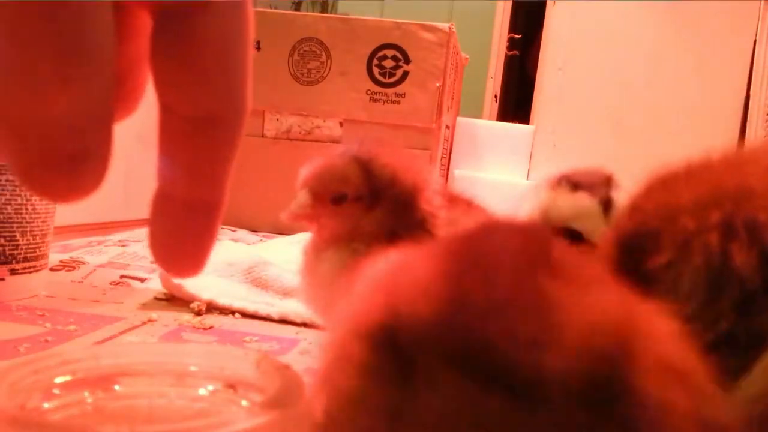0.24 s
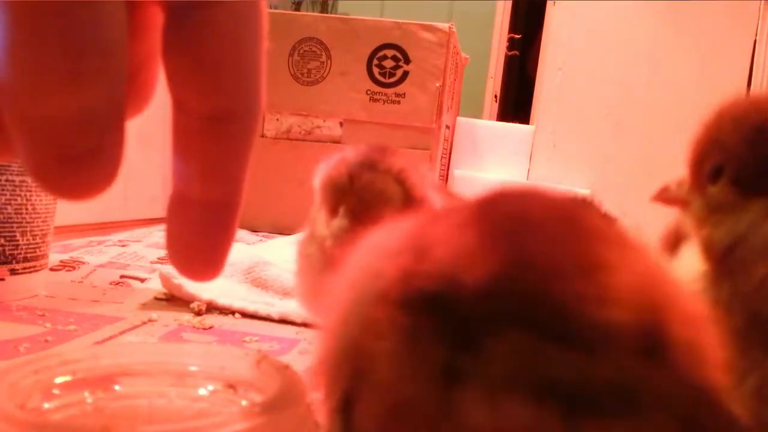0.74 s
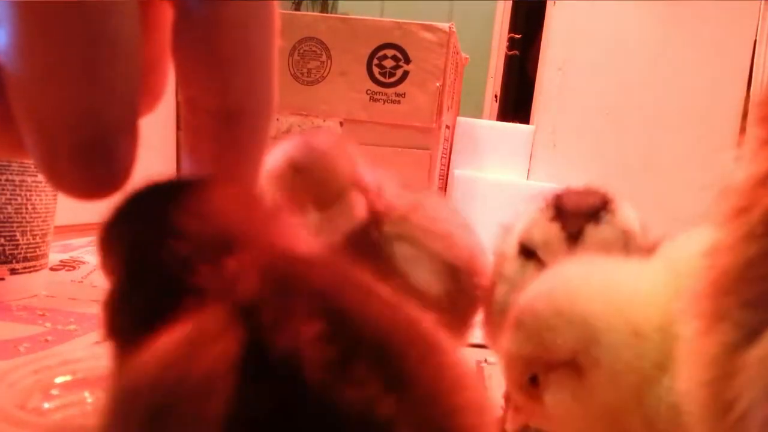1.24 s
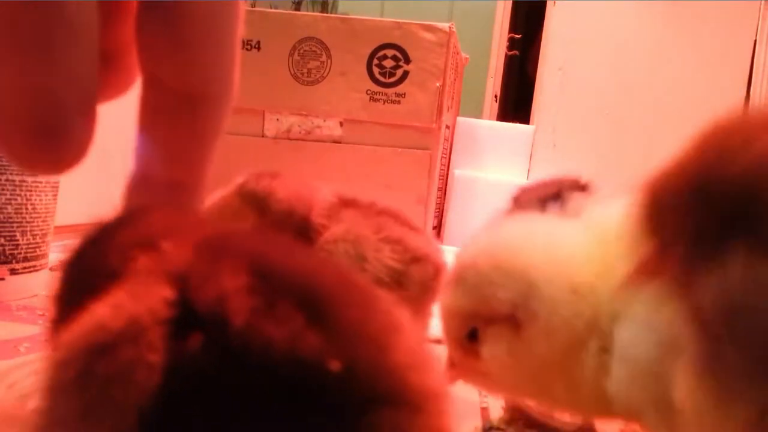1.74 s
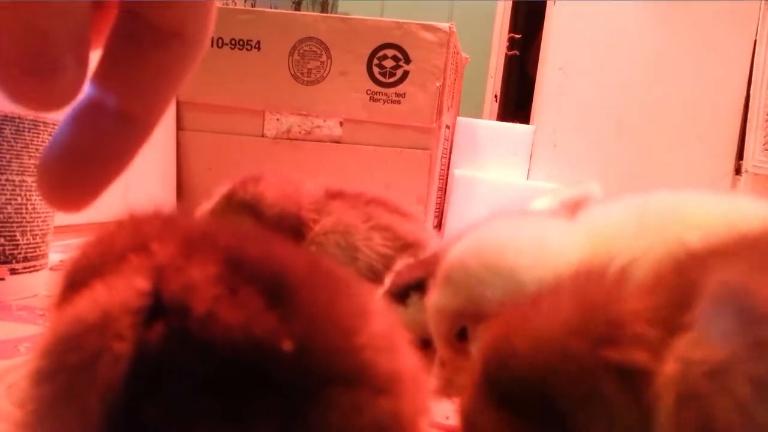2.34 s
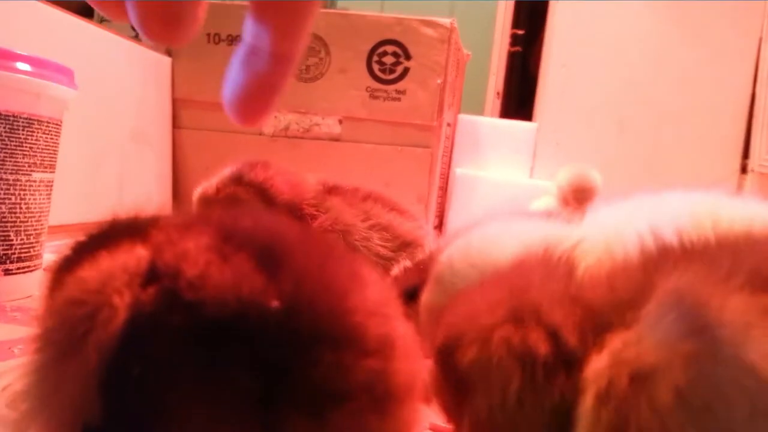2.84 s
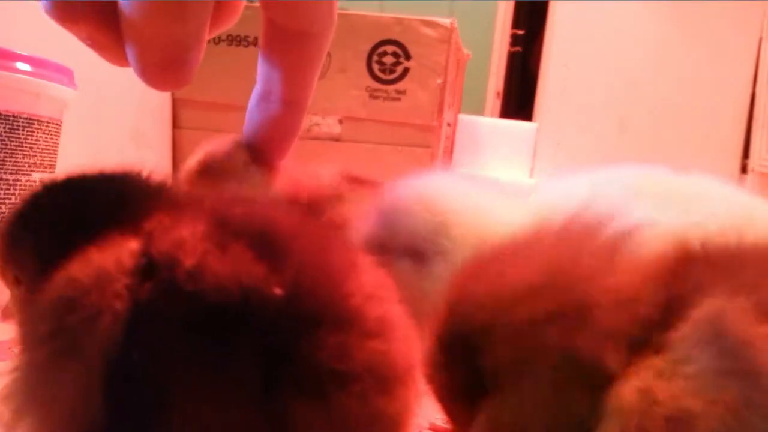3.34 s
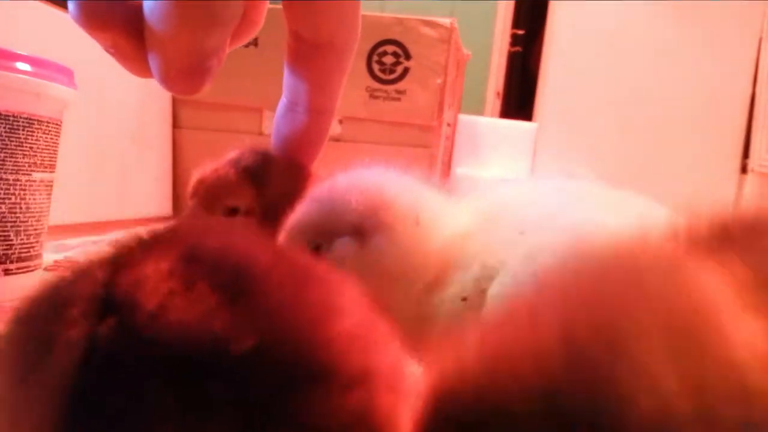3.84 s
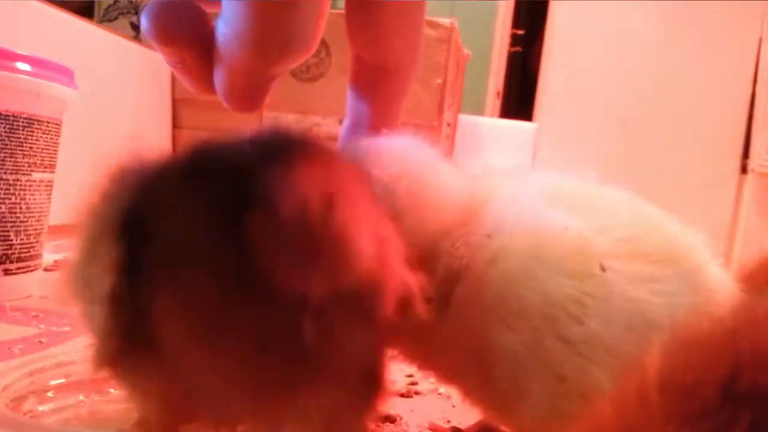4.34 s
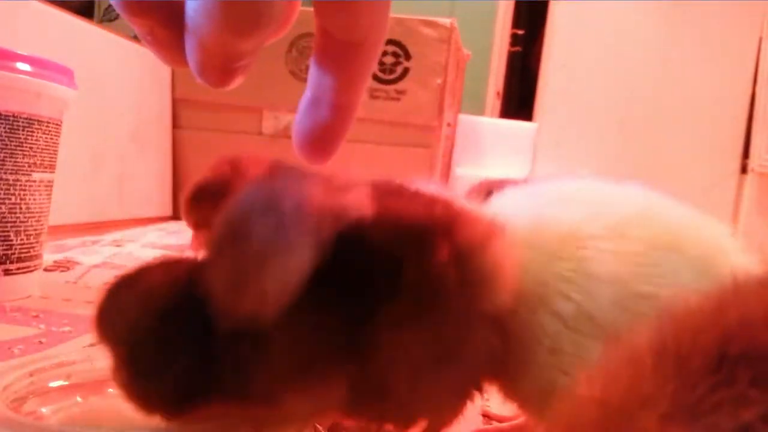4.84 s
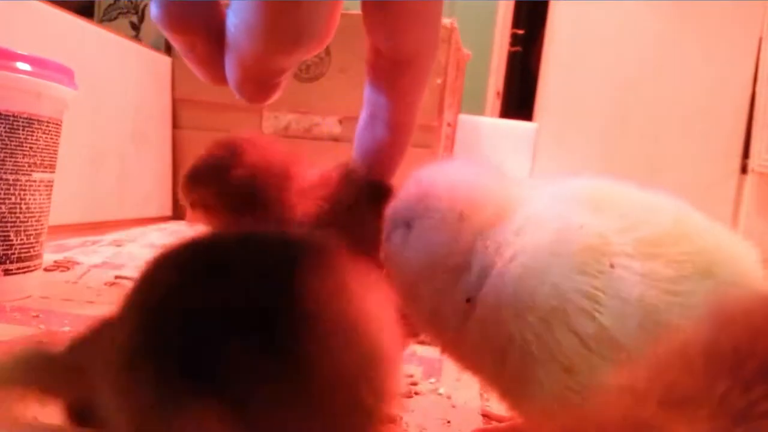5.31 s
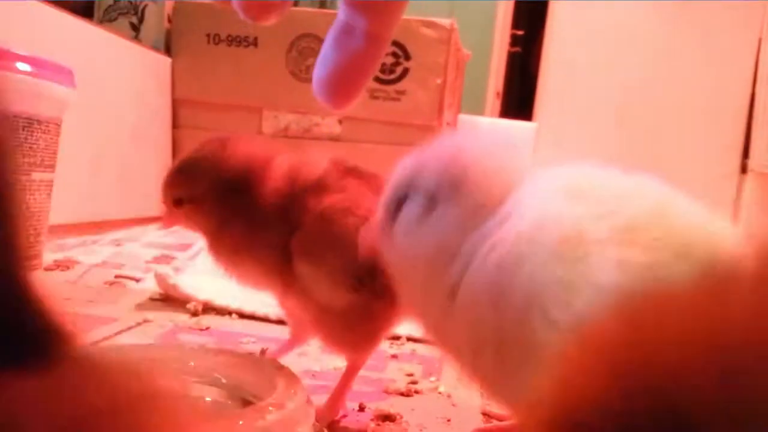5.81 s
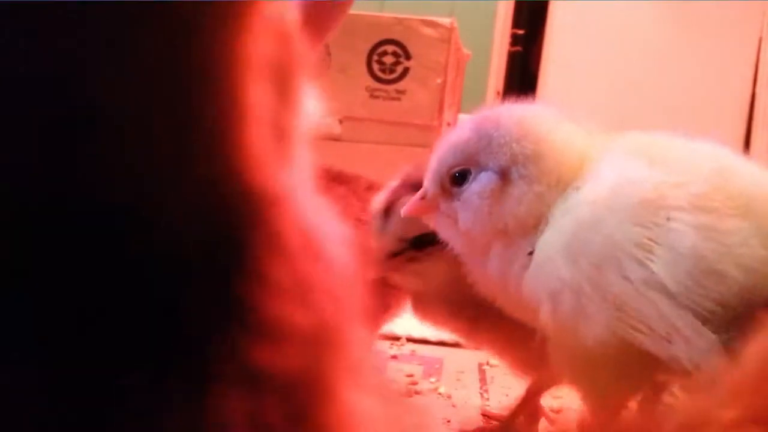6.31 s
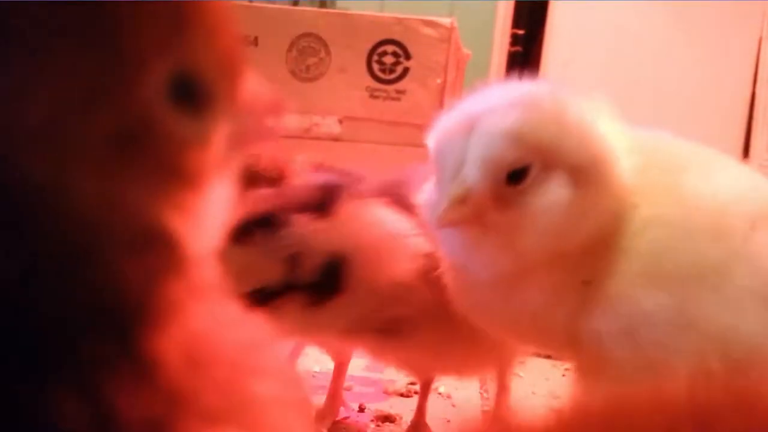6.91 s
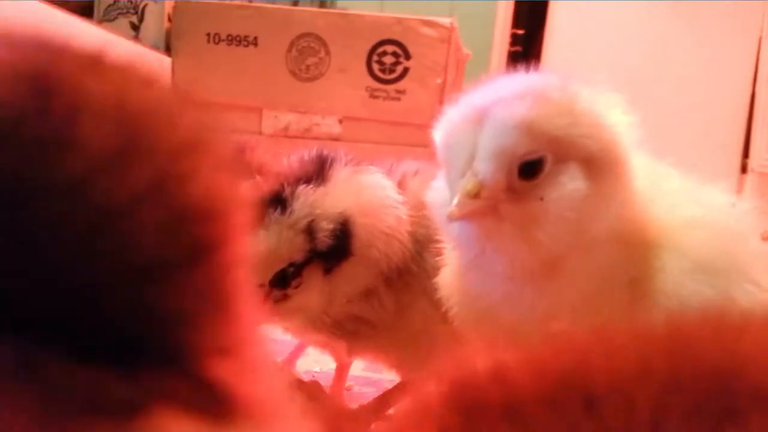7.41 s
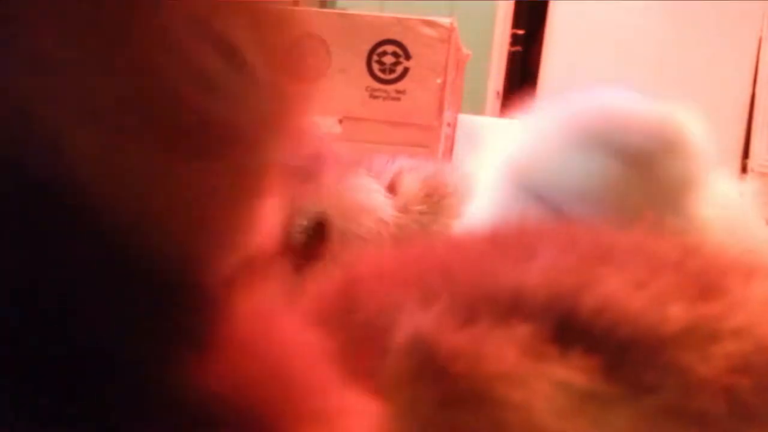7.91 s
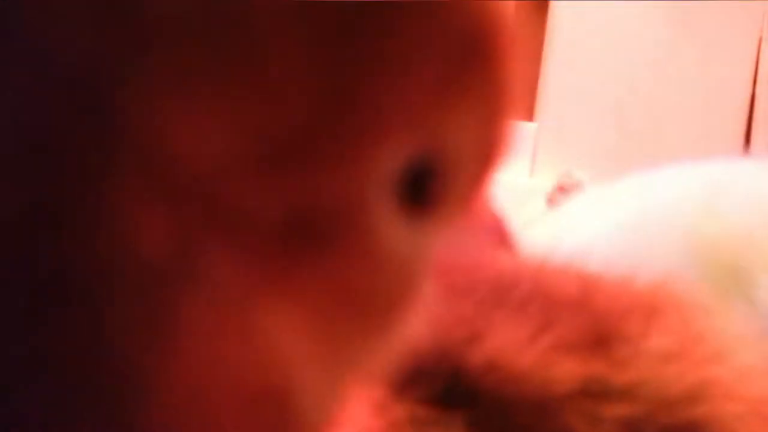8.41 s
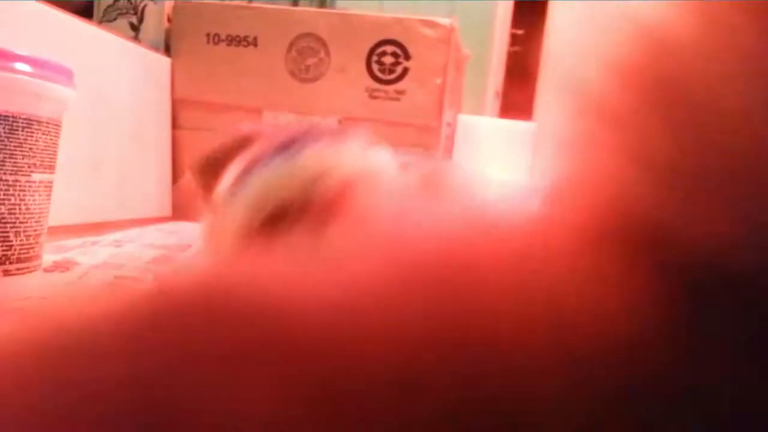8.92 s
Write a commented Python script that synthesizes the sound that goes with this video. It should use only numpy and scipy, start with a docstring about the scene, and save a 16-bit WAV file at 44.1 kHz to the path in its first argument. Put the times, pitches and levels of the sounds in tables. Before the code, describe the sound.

Tiny chicks chirp irregularly in thin, high, quickly bending notes, some near and piercing, others fainter. Between them come close, uneven footfalls, pecks, crisp clicks and dry scratching on paper. The bumping thickens midway, then eases while the peeping crowds together. The place is a small, boxy indoor pen with a very short ring, captured close by a hissy small microphone that distorts on peaks.

```python
"""A brood of chicks peeps right beside a phone, on paper in a cardboard pen.
Each peep is a near sine with weak overtones: a held note, then a sweep, mostly upward; some only glide.
Feet and beaks knock on the hollow floor: decaying sines, noise cracks and ticks; claws and down
scratch the paper as crackling noise bands. The pen rings briefly, the small microphone hisses
and the loudest moments clip."""
import sys
import numpy as np
from scipy import signal
from scipy.fft import rfft, irfft
from scipy.io import wavfile
from scipy.ndimage import uniform_filter1d

SR = 44100
rng = np.random.default_rng(int(sys.argv[2]) if len(sys.argv) > 2 else 0)


def magnitude_from_level(level_db):
    """Linear magnitude for a level in decibels (20 dB per decade)."""
    exponent = np.asarray(level_db, float) / 20
    return 10 ** exponent


def persist_wave(psi):
    """Save psi, clipped to +-1, as 16-bit WAV."""
    counts = np.round(np.clip(psi, -1, 1) * 32767).astype(np.int16)
    wavfile.write(sys.argv[1], SR, np.atleast_2d(counts).T)


N = 403956
T = np.arange(N) / SR


def band(x, lo_hz, hi_hz):
    """Butterworth band-pass."""
    return signal.sosfilt(signal.butter(2, [lo_hz, hi_hz], "band", fs=SR, output="sos"), x)


def decay(t60, count):
    """Exponential decay by 60 dB in t60 seconds."""
    return np.exp(-np.log(1000) * T[:count] / t60)


def ring(hz, t60, count=8192):
    """A decaying sine, as of a struck resonance."""
    return np.sin(2 * np.pi * hz * T[:count]) * decay(t60, count)


def add(out, start_s, x):
    """Mix x into out from start_s."""
    i = int(start_s * SR)
    out[i:i + len(x)] += x[:len(out) - i]


# spectrum of room air and microphone hiss, relative: [pitch_hz, level_db]
AIR_SPECTRUM = [(30, -22), (100, -5.5), (220, -3.5), (700, -8), (2000, -18.5), (4500, -14.5), (6000, -20),
                (14000, -19.5)]


def air():
    """Steady noise, coloured by weighting its spectrum."""
    rms_db = -44
    hz, db = np.transpose(AIR_SPECTRUM)
    f = np.fft.rfftfreq(N, 1 / SR)
    colour = magnitude_from_level(np.interp(np.log(f + 1), np.log(hz), db))
    x = irfft(rfft(rng.standard_normal(N)) * colour, N)
    return x * magnitude_from_level(rms_db) / x.std()


def crackle(bursts_per_s, spread_db, decay_s, bed):
    """Noise in short bursts with widely spread sizes over a steady bed; rms 1."""
    sizes = magnitude_from_level(spread_db * rng.exponential(size=N).clip(0, 3))
    hits = (rng.random(N) < bursts_per_s / SR) * sizes
    power = signal.lfilter([1], [1, -np.exp(-1 / (decay_s * SR))], hits ** 2) + bed
    x = np.sqrt(power) * rng.standard_normal(N)
    return x / x.std()


# light feet shuffling on the paper, level before the band gains: [time_s, level_db]
FEET_LEVEL = [(0.0, -63.5), (1.17, -45), (4.16, -52), (5.87, -35.5), (6.28, -48.5), (9.16, -42.5)]
# claws dragged over the paper, levels before the band gains: [start_s, length_s, dull_db, bright_db]
CLAW_STROKES = [(1.237, 0.088, -41, -48), (1.425, 0.18, -32, -36.5), (1.781, 0.032, -28.5, -52),
                (2.675, 0.12, -45, -52), (3.022, 0.15, -48.5, -68), (3.338, 0.13, -43.5, -46.5),
                (3.722, 0.092, -56.5, -42), (4.646, 0.2, -40, -40.5), (5.053, 0.043, -58, -37),
                (5.167, 0.064, -19, -23), (5.57, 0.061, -23.5, -30), (5.795, 0.12, -70, -53),
                (5.939, 0.11, -41, -55), (6.917, 0.12, -39.5, -51), (8.45, 0.09, -68, -53),
                (8.677, 0.12, -39.5, -49)]


def shuffle():
    """Light feet all the time, and claws dragged over the paper; each band also crackles alone."""
    steady = magnitude_from_level(np.interp(T, *np.transpose(FEET_LEVEL)))
    dull, bright = np.zeros(N), np.zeros(N)
    for start_s, length_s, dull_db, bright_db in CLAW_STROKES:
        stroke = np.clip(np.sin(np.pi * np.clip((T - start_s) / length_s, 0, 1)) * 2, 0, 1)
        dull += magnitude_from_level(dull_db) * stroke
        bright += magnitude_from_level(bright_db) * stroke
    feet = crackle(45, 9.7, .0026, .86)
    claws = crackle(130, 7, .0022, .25)
    # lo_hz, hi_hz, feet_db, claw_db, strokes
    bands = [(246, 987, 15.5, 16.2, dull),
             (740, 2240, 12, 18.8, dull),
             (2000, 4690, 8.5, 12.7, dull),
             (4630, 10600, 0, 9.1, bright)]
    out = np.zeros(N)
    for lo_hz, hi_hz, feet_db, claw_db, drag in bands:
        own = crackle(120, 4.9, .0014, .13)
        treading = magnitude_from_level(feet_db) * steady * (feet + .99 * own)
        dragging = magnitude_from_level(claw_db) * drag * (claws + own / 2)
        out += band(treading + dragging, lo_hz, hi_hz)
    return out


# sharp ticks of claws and beaks: [start_s, level_db]
CLAW_TICKS = [(0.6915, -15.5), (1.1041, -7), (1.1742, -14), (1.2447, 0.5), (1.452, -4.5), (1.4916, -7),
              (1.5274, -11), (1.7989, 5), (2.1306, -18), (2.7661, -23), (3.026, -3.5), (3.087, -12.5),
              (3.1217, -25), (4.4255, -8), (4.4982, -4.5), (4.606, -16.5), (4.868, -12), (5.06, -13),
              (5.0714, -9.5), (5.1188, -15), (5.1474, -17), (5.243, -10), (5.4644, -15), (5.5904, -20),
              (5.6174, 2), (5.685, -3), (5.8077, -23), (5.8394, -1), (5.883, -11), (5.9514, -22),
              (5.9605, -5), (5.981, -27), (6.1413, -9.5), (6.2206, -15), (6.2536, -20), (6.2694, -18),
              (6.3337, -10), (6.3442, -9.5), (7.5345, -9), (8.3364, -12), (8.4194, -18), (8.8303, 2)]


def ticks():
    """Short bright cracks: band-passed noise that dies within milliseconds."""
    out = np.zeros(N)
    for start_s, level_db in CLAW_TICKS:
        noise = band(rng.standard_normal(1024), 1100, 9200)
        add(out, start_s, magnitude_from_level(level_db) * noise * np.exp(-T[:1024] / .00095))
    return out


# resonances of the hollow floor, level against the thud: [pitch_hz, level_db, t60_s]
FLOOR_RINGS = [(284, -61.5, 0.22), (508, -38.5, 0.061), (1284, -24.5, 0.087)]
# steps and pecks on the floor; toes are tuned somewhat above the pitch: [start_s, level_db, pitch_hz]
FLOOR_KNOCKS = [(0.014, 0, 480), (0.5, -19, 920), (0.692, -0.5, 287), (0.856, -16, 960), (1.079, -21, 713),
                (1.103, -18.5, 826), (1.201, -10, 800), (1.244, 0, 430), (1.45, 3.5, 447), (1.482, 4, 750),
                (1.494, -1.5, 1110), (1.787, -7.5, 607), (1.862, -18.5, 940), (2.129, -2, 555),
                (2.286, -5, 510), (2.719, -14.5, 740), (2.954, -5.5, 457), (3.021, -1.5, 2000),
                (3.082, -12.5, 1580), (3.788, -9, 510), (3.892, -14, 264), (4.424, -0.5, 1670),
                (4.492, -8.5, 765), (4.619, 2, 806), (4.634, 1, 350), (4.877, -5, 320), (4.898, -6, 330),
                (5.068, 6, 990), (5.312, -6.5, 1260), (5.339, -12, 1110), (5.463, -1, 950), (5.597, 1, 366),
                (5.617, -1, 328), (5.684, 4, 744), (5.804, -11.5, 590), (5.841, 0, 1390),
                (5.872, -4.5, 1060), (5.938, -9, 1840), (6.239, 4, 360), (6.61, -6.5, 436),
                (6.689, -10.5, 890), (6.9, -6.5, 326), (6.947, -1, 520), (7.532, 0.5, 376),
                (8.111, -6, 332), (8.265, -6.5, 614), (8.334, -15, 1320), (8.454, -10, 1600),
                (8.499, -8.5, 1330), (8.799, -3.5, 405.8)]


def knocks():
    """A foot lands toe by toe: dull one-cycle thuds, a papery crack, and the floor rings."""
    out = np.zeros(N)
    floor = sum(magnitude_from_level(db) * ring(hz, t60) for hz, db, t60 in FLOOR_RINGS)
    for start_s, level_db, hz in FLOOR_KNOCKS:
        hit = np.zeros(8192)
        for k, (late, tune, size) in enumerate(rng.random((4, 3))):
            toe_hz = hz * (1.06 + .22 * tune)
            thud = (-1) ** k * (.044 + size) * ring(toe_hz, .0027 + .74 / toe_hz, count=2048)
            add(hit, .001 + k * .0022 * (.5 + late), thud)
        hit = hit / np.abs(hit).max() + floor
        noise = rng.standard_normal(2048)
        crack = magnitude_from_level(-4) * (hz / 800) ** .12 * band(noise, 460, 3240) * np.exp(-T[:2048] / .0072)
        # higher thuds crack sharper
        sharp = magnitude_from_level(-26) * hz / 800 * band(noise, 4300, 8700) * np.exp(-T[:2048] / .0034)
        add(hit, .0006, crack + sharp)
        add(out, start_s, magnitude_from_level(level_db) * hit)
    return out


def pen(x, t60, wet_db):
    """Cardboard walls: a dense short tail that starts after the first wall echo."""
    tail = rng.standard_normal(16384) * decay(t60, 16384) * (T[:16384] > .002)
    tail = band(tail, 167, 7600)
    tail = tail / np.sqrt(np.sum(tail ** 2))
    return x + magnitude_from_level(wet_db) * signal.fftconvolve(x, tail)[:N]


def swept(row, shape, drift, ending):
    """Points (s, Hz, dB) of a held note that eases into an S-shaped sweep and then ends."""
    start_s, hold_s, held_hz, end_hz, level_db = row
    peak_at, onset_db, knee_db, half_db, end_db = shape
    silent_s, lost_hz, lost_db = ending
    # wider and louder sweeps last longer: 20 dB doubles the time, up to a level of -7 dB
    sweep_s = .026 + .000002 * abs(end_hz - held_hz)
    sweep_s *= 2 ** ((min(level_db, -7) + 18.5) / 20)
    t = np.arange(start_s - hold_s, start_s + sweep_s + silent_s, .001)
    x = np.clip((t - start_s) / sweep_s, 0, 1)
    after = np.clip((t - start_s - sweep_s) / silent_s, 0, 1)
    held = held_hz + drift * np.minimum(t - start_s, 0)
    if drift > -8000:  # a note starts 200 Hz flat and slides up, unless it sags
        held -= 200 * np.exp(-(t - t[0]) / .004)
    pitch = held + (end_hz - held_hz) * x ** 2 * (3 - 2 * x) - lost_hz * after ** 2.5
    corners = [t[0], start_s, start_s + peak_at * sweep_s,
               start_s + (1 + peak_at) / 2 * sweep_s, start_s + sweep_s]
    level = np.interp(t, corners, [onset_db, knee_db, 0, half_db, end_db])
    return np.transpose([t, pitch, level_db + level - lost_db * after])


def glide(start_s, length_s, from_hz, to_hz, peak_db):
    """Corner points (s, Hz, dB) of a straight glide that swells and fades."""
    peak_at = .57  # share of the length
    return [(start_s, from_hz, peak_db - 6.5),
            (start_s + peak_at * length_s, from_hz + peak_at * (to_hz - from_hz), peak_db),
            (start_s + length_s, to_hz, peak_db - 2)]


# two hoarse peeps that throb: [start_s, throbs_per_s, depth (0-1)]
HOARSE_PEEPS = [(7.265, 260, .6), (7.595, 190, 1)]


def peep(rows, chance):
    """A near sine with rounded glide; the octave is loud where it meets the windpipe resonance."""
    s, hz, db = np.transpose(rows)
    fade_s = .003
    t = np.arange(s[0], s[-1] + fade_s, 1 / SR)
    hz = uniform_filter1d(np.interp(t, s, hz), size=130, mode="nearest")
    size = uniform_filter1d(np.interp(t, s, magnitude_from_level(db)), size=130, mode="nearest")
    # a new chance value every 4 ms moves pitch and level together
    flutter = np.interp(t - t[0], np.arange(len(chance)) * .004, chance)
    phase = 2 * np.pi * np.cumsum(hz * (1 + .003 * flutter)) / SR
    windpipe = magnitude_from_level(-37) + magnitude_from_level(-7) / (1 + ((2 * hz - 5250) / 380) ** 2) ** 2
    tone = np.sin(phase) + windpipe * np.sin(2 * phase) + magnitude_from_level(-47) * np.sin(3 * phase)
    edge = np.clip(np.minimum(t - t[0], t[-1] - t) / fade_s, 0, 1)
    for start_s, throbs_per_s, depth in HOARSE_PEEPS:
        if abs(s[0] - start_s) < .014:
            edge = edge * (1 + depth * np.cos(2 * np.pi * throbs_per_s * t))
    return np.sqrt(2) * tone * edge * size * magnitude_from_level(1.8 * flutter)


# Held notes that sweep, by kind; start_s is where the sweep starts, after the hold.
# columns of all five: [start_s, hold_s, held_hz, end_hz, level_db]
# flicks: the note creeps upward, loudest at its end, fading while it sweeps
FLICK_PEEPS = [(0.832, 0.042, 2767, 4260.0, -21.5), (2.185, 0.0091, 2600, 4320.0, -25.0),
               (2.921, 0.028, 3004, 4660, -18.5), (3.402, 0.028, 2770, 4660.0, -24),
               (3.642, 0.0086, 2980, 4300, -22), (4.209, 0.031, 2860, 4370, -11),
               (4.84, 0.017, 2854, 4440.0, -21), (5.184, 0.027, 2915, 3040, -10),
               (6.047, 0.019, 2840, 4930, -21.5), (7.132, 0.028, 3440, 5120.0, -21.5),
               (7.301, 0.036, 3720.0, 4400, -19), (7.616, 0.019, 3390.0, 4280.0, -19.0),
               (8.231, 0.033, 2894, 3920, -8.5)]
# cups: a nearly level note, loudest at its end, fading while it sweeps
CUP_PEEPS = [(1.258, 0.033, 2690.0, 3250, -27), (1.455, 0.018, 3270.0, 2850.0, -20.0),
             (1.672, 0.024, 3700.0, 3500, -26.0), (2.003, 0.036, 2660, 4500, -20.5),
             (2.356, 0.022, 2805, 4340, -28.5), (3.261, 0.023, 2900, 4350, -19),
             (5.67, 0.04, 2836, 3330, -19.0), (6.329, 0.045, 2587, 4340, -15.0),
             (6.596, 0.028, 3387, 4680, -12), (6.653, 0.02, 2890, 4350.0, -14.0),
             (7.085, 0.025, 3100, 4600, -23.0), (7.655, 0.025, 2718, 3820.0, -7.0),
             (7.777, 0.032, 3223, 3870, -20), (7.998, 0.026, 3760, 3250.0, -24.5),
             (8.223, 0.027, 3176, 4650, -7.5), (8.504, 0.031, 3147, 5160.0, -15.5),
             (8.785, 0.033, 3390, 3050.0, -24.5), (8.942, 0.023, 3250, 4700, -13.5)]
# dips: the note sags before the sweep
DIP_PEEPS = [(0.668, 0.034, 3320, 3000, -21), (0.795, 0.03, 3830, 2685, -15),
             (0.903, 0.032, 3150, 4950, -11.5), (3.397, 0.042, 3370, 4920.0, -22.5),
             (3.687, 0.007, 3480, 4260.0, -30), (4.962, 0.033, 3250, 4500, -12),
             (4.978, 0.044, 2574, 3840, -17), (6.258, 0.02, 3230, 4540, -11),
             (6.438, 0.02, 3290, 4620.0, -25), (7.308, 0.012, 2743, 4280, -19),
             (8.414, 0.02, 3540, 4520.0, -18)]
# arches: loudest in the sweep, the end droops
ARCH_PEEPS = [(0.04, 0.0062, 3460.0, 4930, -22), (1.722, 0.03, 3200.0, 5220, -10.5),
              (2.556, 0.019, 3000.0, 4910, -11.5), (3.051, 0.041, 2650.0, 4030, -14.5),
              (3.59, 0.01, 2920.0, 4670, -18.5), (4.406, 0.021, 3340.0, 4400, -14),
              (7.035, 0.0063, 3200.0, 4710.0, -19), (7.67, 0.019, 3640.0, 5040, -7.5),
              (8.317, 0.033, 3000.0, 5350.0, -13.5), (9.108, 0.0076, 2920.0, 4900, -21.5)]
# hooks: an arch whose end plunges
HOOK_PEEPS = [(3.937, 0.025, 3010.0, 4700, -13.5), (4.244, 0.025, 3370, 4700, -12),
              (4.656, 0.015, 3470, 4350, -2), (5.712, 0.013, 3290, 4840, -12.5),
              (6.8, 0.015, 3160, 4680.0, -22), (7.044, 0.039, 3410.0, 4370, -13),
              (8.481, 0.00075, 3250.0, 4500, -19.5)]
# loudness along each kind, dB against the row's level:
# [peak_at (share of the sweep), onset_db, sweep_start_db, halfway_from_peak_to_end_db, sweep_end_db]
FLICK_SHAPE = (0.43, -8.5, 2, -12, -18)
CUP_SHAPE = (0.32, -5.5, 1, -11.5, -20)
DIP_SHAPE = (0.33, -5, -5, -12, -18.5)
ARCH_SHAPE = (0.23, -11.5, -7, -4, -12)
HOOK_SHAPE = (0.54, -12.5, -3.5, -3.5, -7)
# plain glides without a held note: [start_s, length_s, from_hz, to_hz, peak_db]
PLAIN_GLIDES = [(.623, .045, 2970, 4400, -21), (1.222, .052, 4650, 3040, -20),
                (1.278, .03, 3000, 4300, -34), (1.563, .045, 2960, 4300, -27),
                (2.604, .031, 2810, 4120, -26), (3.231, .03, 3720, 3200, -20),
                (3.609, .03, 3080, 2800, -23), (6.115, .028, 2900, 4200, -31),
                (7.019, .026, 3300, 3000, -15), (7.7, .025, 2900, 3500, -29),
                (8.388, .014, 4150, 3700, -29), (8.703, .038, 3780, 4290, -33),
                (8.975, .03, 4250, 4050, -33), (9.138, .02, 2990, 2940, -16)]
# one long cry climbs, holds and falls: [time_s, pitch_hz, level_db]
LONG_CRY = [(8.794, 2590, -28), (8.833, 4200, -15), (8.855, 4264, -4), (8.872, 2690, -10),
            (8.885, 2300, -35)]


def chicks():
    """All peeps: each kind of whistle has its own loudness shape, pitch drift and ending."""
    # after the sweep: s until silent, Hz lost by then, dB lost by then
    stop, droop, plunge = (.004, 40, 10), (.016, 350, 12), (.02, 1100, 12)
    # the third entry is the drift of the held note in Hz per s
    kinds = [(FLICK_PEEPS, FLICK_SHAPE, 4000, stop),
             (CUP_PEEPS, CUP_SHAPE, -1500, stop),
             (DIP_PEEPS, DIP_SHAPE, -8000, stop),
             (ARCH_PEEPS, ARCH_SHAPE, 1200, droop),
             (HOOK_PEEPS, HOOK_SHAPE, 1800, plunge)]
    peeps = [swept(row, *how) for rows, *how in kinds for row in rows]
    peeps += [glide(*row) for row in PLAIN_GLIDES]
    peeps += [LONG_CRY]
    out = np.zeros(N)
    for rows in peeps:
        add(out, rows[0][0], peep(rows, rng.standard_normal(64)))
    return out


def scene():
    """Chicks, feet and paper in the pen, close to the microphone."""
    voices = chicks()
    add(voices, .011, magnitude_from_level(-30) * voices.copy())  # the far wall returns one clear echo
    voices = pen(voices, .14, -16.5)
    feet = pen(knocks() + ticks(), .16, -18)
    return (voices + feet + shuffle())[None]


def band_limit(x):
    """A steep low-pass at the top of the band."""
    return signal.sosfilt(signal.butter(12, 14500, fs=SR, output="sos"), x)


def record(dry):
    """The small microphone drops the deep bass, adds its noise and clips at full scale."""
    high_pass = signal.butter(4, 200, "high", fs=SR, output="sos")
    x = signal.sosfilt(high_pass, dry) + air()
    return band_limit(np.clip(x, -1, 1))


dry = scene()
out = record(dry)
persist_wave(out)
```